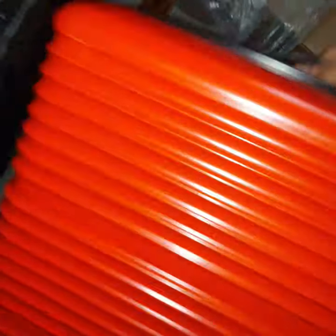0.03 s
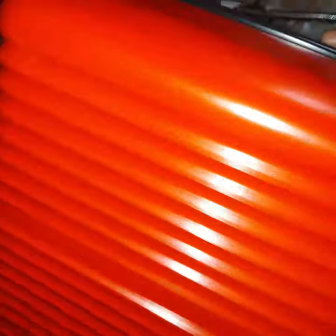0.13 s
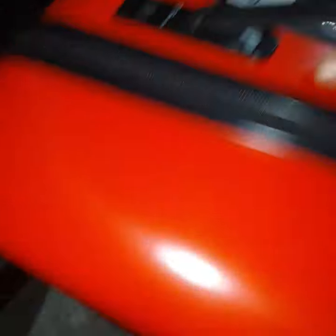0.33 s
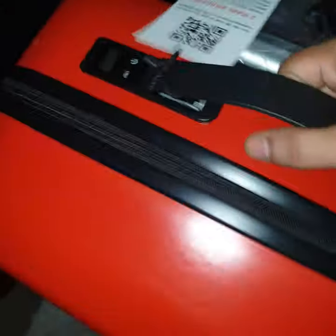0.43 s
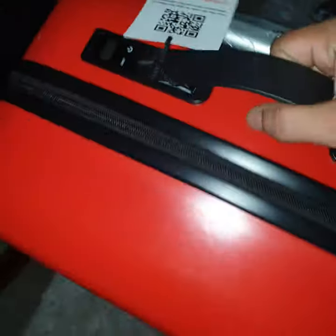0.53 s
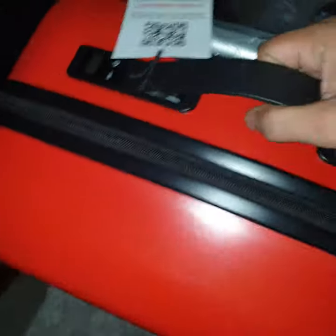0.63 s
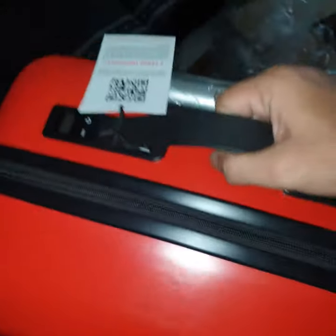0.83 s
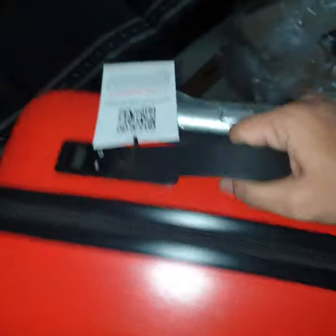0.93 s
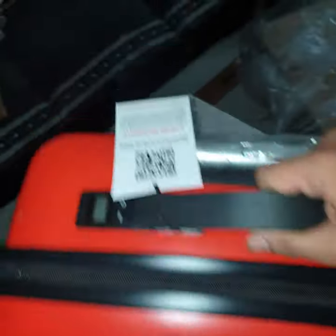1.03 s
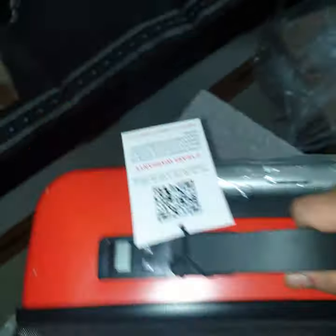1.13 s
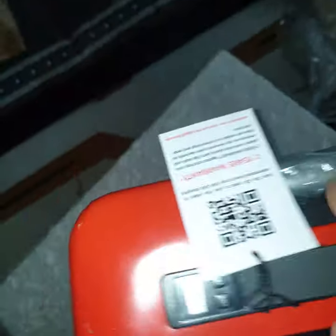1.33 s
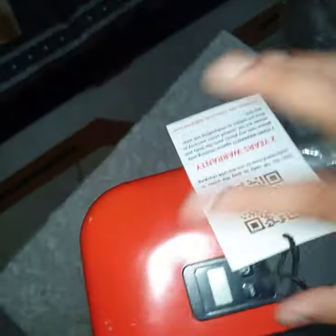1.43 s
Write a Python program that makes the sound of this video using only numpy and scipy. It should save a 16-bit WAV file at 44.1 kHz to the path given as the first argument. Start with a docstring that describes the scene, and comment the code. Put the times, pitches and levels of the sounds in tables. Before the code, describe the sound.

Hollow double knock of a plastic suitcase being tipped and set down, its handle clicking.

```python
"""A hollow rumble and soft bumps, close to the microphone: a hard plastic suitcase is tipped up in a
small room. Half a second in it knocks down in a quick cluster of blows that clack, ring its walls and
make the shell boom. The handle snaps against its stops and small metal fittings tinkle. Softer knocks,
clicks and the rub of a hand follow over the room's low rumble."""
import sys
import numpy as np
from scipy import signal
from scipy.fft import rfft, irfft, next_fast_len
from scipy.io import wavfile
from scipy.ndimage import map_coordinates

SR = 44100
rng = np.random.default_rng(int(sys.argv[2]) if len(sys.argv) > 2 else 0)


def dump_mix(stems):
    """Bounce the given channels to the path in sys.argv[1] as a 16-bit WAV at rate SR."""
    frames = np.atleast_2d(stems).T  # one column per channel
    limited = np.clip(frames, -1, 1)  # hard clip at full scale
    pcm = np.round(limited * 32767).astype(np.int16)
    wavfile.write(sys.argv[1], SR, pcm)


N = 66150

# how alike the two channels are for diffuse sound (frequency [Hz], likeness [0-1])
DIFFUSE_LIKENESS = [(30, 0.35), (70, 0.71), (140, 0.86), (280, 0.96), (550, 0.55), (2000, 0), (4000, 0),
                    (12000, 0)]
# the same for contacts close to the microphone (frequency [Hz], likeness [0-1])
CLOSE_LIKENESS = [(150, .97), (500, 0.33), (2000, 0.87), (5000, 0), (12000, 0)]
CLICK_RISE_S, TOP_HZ = 0.00091, 16050


def amp(db):
    """Decibels to gain."""
    return 10 ** (np.asarray(db) / 20)


def unit(x):
    """Scale to rms 1."""
    return x / np.sqrt(np.mean(x ** 2) + 1e-20)


def along(points, hz):
    """Read (frequency, value) points on a log axis."""
    freqs, values = np.transpose(points)
    return np.interp(np.log(hz + 1), np.log(freqs + 1), values)


def clock():
    """Time of each sample in seconds."""
    return np.arange(N) / SR


def fade(t, t60):
    """Exponential decay, 60 dB down after t60."""
    return amp(-60 * t / t60)


def wobble(rate_hz):
    """A smooth random curve for each channel."""
    return np.array([map_coordinates(rng.standard_normal(4000), [clock() * rate_hz]) for _ in range(2)])


def add(track, at, sound):
    """Mix a sound in from a time in seconds."""
    start = int(np.clip(round(at * SR), 0, N - 1))
    track[..., start:] += sound[..., :N - start]


def filtered(x, response):
    """Apply a gain that depends on frequency."""
    size = next_fast_len(N + 8192)
    return irfft(rfft(x, size) * response(np.fft.rfftfreq(size, 1 / SR)), size)[..., :N]


def noise(colour, likeness, tilt_db=0, top_hz=SR):
    """Stereo noise of rms 1, tilted by tilt_db per octave above 400 Hz."""
    def response(hz):
        width = np.arccos(np.clip(along(likeness, hz), -1, 1)) / 2
        tilt = tilt_db * np.log2(np.maximum(hz, 400) / 400)
        band = (hz > 20) / (1 + (hz / top_hz) ** 8)
        return amp(along(colour, hz) + tilt) * band * np.array([np.cos(width), np.sin(width)])
    mid, side = filtered(rng.standard_normal((2, N)), response)
    return unit(np.array([mid + side, mid - side]))


def ring(modes, t):
    """Damped modes, each reaching left and right at slightly different times."""
    out = 0
    for hz, db, t60 in modes:
        arrival = t + rng.normal(0, 2.2e-5, (2, 1))
        out += amp(db) * fade(t, t60) * np.sin(2 * np.pi * (hz * arrival + rng.random()))
    return out


def struck(modes, t, rise_cycles=0.49):
    """Modes set ringing by a blow; low ones build up slowest."""
    return -sum(amp(db) * fade(t, t60) * np.sin(2 * np.pi * hz * t) * (1 - np.exp(-t * hz / rise_cycles))
                for hz, db, t60 in modes)


def favour(modes, ring_hz, width_oct, rest_db=-13):
    """The point of contact favours the modes near one pitch; the rest ring weaker."""
    return [(hz, db + rest_db * (1 - np.exp(-(np.log2(hz / ring_hz) / width_oct) ** 2)), t60)
            for hz, db, t60 in modes]


def room(x):
    """The small room's tail, building up just after the direct sound."""
    # reverberation time (frequency [Hz], t60 [s])
    decay = [(150, 0.19), (330, 0.4), (600, 0.31), (2500, 0.38), (12000, 0.44)]
    white = noise([(20, 0), (20000, 0)], DIFFUSE_LIKENESS)[:, :SR // 2]
    hz, t, bands = signal.stft(white, SR, nperseg=256)
    envelope = fade(t, along(decay, hz)[:, None]) * (1 - np.exp(-t / 0.0024))
    tail = signal.istft(bands * envelope, SR, nperseg=256)[1]
    return signal.fftconvolve(x, tail / np.linalg.norm(tail[0]), axes=1)[:, :N]


def room_tone():
    """The room's steady rumble, with a faint flickering rustle."""
    # spectra of the rumble and the rustle (frequency [Hz], level [dB])
    air_colour = [(25, -22), (50, -6.5), (85, -8), (130, 1), (165, 3), (200, -6.5), (260, -2.5),
                  (370, -5.5), (480, -16.5), (800, -11.5), (1150, -20.5), (2450, -20.5), (2800, -26),
                  (3300, -33.5), (8200, -38.5), (15500, -42.5)]
    rustle_colour = [(200, -3.5), (550, -2), (1800, -7), (3000, -15), (6800, -18), (7500, -14), (8100, -27),
                     (16000, -37)]
    flicker_db = 5.5 * np.tanh(wobble(rate_hz=41)[0])
    rustle = amp(-52 + flicker_db) * noise(rustle_colour, DIFFUSE_LIKENESS)
    return amp(-41) * noise(air_colour, DIFFUSE_LIKENESS) + rustle


def handling():
    """The shifting case rumbles and hisses, dying away once it lands; the hand rubs the handle."""
    # spectra of the shifting shell, its sliding and the rubbing hand (frequency [Hz], level [dB])
    rumble_colour = [(25, -22), (45, 1.5), (90, -6), (134, 5), (200, -11), (350, -13), (520, -12.5),
                     (620, -25), (1270, -31), (1600, -56), (3000, -51), (6600, -88)]
    slide_colour = [(100, -38), (175, 2.5), (260, -1), (320, -2.5), (400, -9), (600, -15.5), (1200, -13),
                    (3100, -25.5), (16000, -45)]
    rub_colour = [(300, -32), (950, 1), (1350, 0), (2000, 8), (3000, -6), (6500, -8.5), (15000, -25)]
    # swell of the rumble (time [s], level [dB])
    rumble_level = [(0, -63), (.08, -41), (.12, -42), (.19, -30), (.225, -26), (.30, -27), (.37, -24.5),
                    (.445, -29.5), (.495, -30), (.525, -23.5), (.62, -33.5), (.69, -43), (.745, -40.5),
                    (.81, -52), (1.5, -88)]
    # strokes of the hand (middle [s], half length [s], level [dB])
    rubs = [(0.642, 0.0028, -42), (1.046, 0.022, -50.5), (1.35, 0.0052, -47), (1.451, 0.011, -48),
            (1.49, 0.018, -46)]
    t = clock()
    rumble = amp(np.interp(t, *np.transpose(rumble_level))) * noise(rumble_colour, DIFFUSE_LIKENESS)
    slide = amp(-37) * np.interp(t, [0.59, 0.79], [1, 0]) * noise(slide_colour, DIFFUSE_LIKENESS)
    strokes = sum(amp(db) * np.exp(-((t - at) / half) ** 2) for at, half, db in rubs)
    judder = amp(3 * wobble(rate_hz=35.78)[0])
    return (rumble + strokes * noise(rub_colour, CLOSE_LIKENESS)) * judder + slide


def bumps(swell_cycles=0.83):
    """Padded contacts as the case is tipped: a few low cycles that swell and die."""
    # soft bumps (time [s], level [dB], pitch [Hz])
    contacts = [(0.094, -29.5, 89), (0.156, -26, 71.3), (.214, -19, 145), (0.254, -21, 108),
                (0.285, -17.5, 73), (0.338, -21, 109), (0.36, -18.5, 123.4), (0.414, -30, 118),
                (0.727, -39, 57), (0.77, -39.5, 98)]
    t, out = clock(), np.zeros((2, N))
    for at, db, hz in contacts:
        swell = t * hz / swell_cycles
        add(out, at, amp(db) * swell ** 2 * np.exp(2 * (1 - swell)) * np.sin(2 * np.pi * hz * t))
    return out + amp(-26) * room(out)


def fittings(flutter_hz=130, flutter_depth=0.6, wander_s=1.5e-5):
    """Small loose metal parts tick and ring on in a high shimmer, fluttering as they swing."""
    # fittings touching (time [s], level [dB], favoured pitch [Hz])
    tinks = [(0.171, -63, 11590), (0.206, -62, 11590), (0.375, -64, 13160), (0.409, -62, 11590),
             (0.428, -56, 13160), (0.541, -50, 11590), (0.569, -47.5, 11620), (0.605, -54, 13160),
             (0.66, -49, 11590), (0.732, -48.5, 10200), (0.734, -49, 11830)]
    # modes of the metal (frequency [Hz], level [dB], t60 [s])
    metal_modes = [(10200, 3.5, 0.14), (11600, 6, 0.18), (13160, 1, .22), (15280, -1, .14)]
    # spectrum of the ticks and the shimmer (frequency [Hz], level [dB])
    colour = [(8500, -17), (10400, -4), (11600, -0.5), (12500, -2), (13100, -4), (14000, -11),
              (16000, -5.5)]
    # swell of the shimmer (time [s], level [dB])
    shimmer_level = [(0, -61), (.48, -60), (.55, -44.5), (.60, -63), (.70, -74), (.95, -70), (1.015, -57),
                     (1.16, -66.5), (1.5, -74)]
    t, out = clock(), np.zeros((2, N))
    for at, db, ring_hz in tinks:
        swung = t + wander_s * wobble(flutter_hz)
        tone = ring(favour(metal_modes, ring_hz, width_oct=0.03), swung)
        flutter = unit(1 + flutter_depth * wobble(flutter_hz))
        tick = amp(8.5) * fade(t, t60=0.033) * noise(colour, CLOSE_LIKENESS)
        add(out, at, amp(db) * (tone * flutter + tick) * (1 - np.exp(-t / CLICK_RISE_S)))
    shimmer_gain = amp(np.interp(t, *np.transpose(shimmer_level)))
    return out + amp(-6) * room(out) + shimmer_gain * noise(colour, DIFFUSE_LIKENESS)


def handle():
    """The handle hits its stops: a crack and a brief plastic ring."""
    # clicks (time [s], level [dB], favoured pitch [Hz], crack tilt [dB/octave], crack treble limit [Hz],
    # left over right [dB])
    clicks = [(0.5053, -17.5, 2850, -1, 9500, -1.5), (0.5622, -17, 3120, -1, 15500, 0.5),
              (0.661, -41, 4200, 4, 4500, 0), (1.099, -37.5, 3740, 2.5, 6450, 0),
              (1.3642, -32, 1700, -2.5, 7500, -5), (1.3685, -36, 8150, 2, 13500, 11),
              (1.4812, -39, 6500, 3.5, 10000, -2), (1.4915, -32, 1850, -.5, 6500, 0)]
    # modes of the handle (frequency [Hz], level [dB], t60 [s])
    handle_modes = [(1430, -2, 0.01), (1820, 1, 0.017), (2850, -1, 0.014), (3120, -.5, 0.012),
                    (4200, 2, 0.011), (6100, 1, 0.011), (8150, -5, .01)]
    # spectrum of the crack (frequency [Hz], level [dB])
    crack_colour = [(300, 4), (800, -2.5), (1700, -1), (3000, -28), (3700, 1), (6300, -6.5), (9300, -7),
                    (11200, -0.5), (16000, -3)]
    t, out = clock(), np.zeros((2, N))
    for at, db, ring_hz, tilt_db, top_hz, pan_db in clicks:
        crack = amp(1.5) * fade(t, t60=0.013) * noise(crack_colour, CLOSE_LIKENESS, tilt_db, top_hz)
        tone = amp(4.5) * ring(favour(handle_modes, ring_hz, width_oct=0.1), t)
        click = amp(db) * (crack + tone) * (1 - np.exp(-t / CLICK_RISE_S))
        pan = amp([[pan_db / 2], [-pan_db / 2]])
        add(out, at, click * pan + amp(-4.5) * room(click))
    return out


def shell_knocks(contact_rise_s=0.00052):
    """Each blow clacks, rings the walls and makes the hollow case boom."""
    # blows on the shell (time [s], boom [dB], wall ring [dB], clack [dB], clack tilt [dB/octave])
    knocks = [(.5080, -9, -10, -21, -2), (0.5198, -12, -9.5, -14.5, -1.5), (0.5243, -38, -6, -14, -10.5),
              (0.5319, -6, -36, -48, -5), (0.662, -30, -29, -35.5, -4), (1.005, -28, -70, -28, -4.5),
              (1.0124, -22.5, -23, -30.5, -6), (1.035, -23.5, -29.5, -33, -7), (1.089, -27, -36, -45, -9),
              (1.3647, -58, -29, -30, -1), (1.434, -31.5, -25, -38, -4)]
    # modes of the hollow shell, its walls and the stiff panel hit (frequency [Hz], level [dB], t60 [s])
    hollow_modes = [(145, -11, 0.14), (163.7, 1.5, 0.1), (245, -21, 0.29), (303, -36, 0.066)]
    wall_modes = [(369, -10.5, 0.11), (466.3, -10, 0.067), (541, -11, 0.064), (596, -26, 0.11),
                  (695, -29, 0.11), (886, -23, 0.067), (1147, -31, 0.016)]
    panel_modes = [(1080, 1, .022), (2000, 0, .025), (2350, -4, .012)]
    # spectrum of the clack (frequency [Hz], level [dB])
    clack_colour = [(60, -6), (200, -7), (450, -2.5), (720, -4), (1150, 0.5), (1500, -10.5), (2100, -4),
                    (2700, -13.5), (5000, -19.5), (15000, -29.5)]
    t, boom, clack = clock(), np.zeros((2, N)), np.zeros((2, N))
    hollow, walls = struck(hollow_modes, t), struck(wall_modes, t)
    for at, boom_db, wall_db, clack_db, tilt_db in knocks:
        panel = ring([(hz, db + tilt_db * np.log2(hz / 400), t60) for hz, db, t60 in panel_modes], t)
        burst = fade(t, t60=0.032) * noise(clack_colour, CLOSE_LIKENESS, tilt_db)
        contact = (panel + burst) * (1 - np.exp(-t / contact_rise_s))
        add(boom, at, amp(boom_db) * hollow)
        add(clack, at, amp(wall_db) * walls + amp(clack_db) * contact)
    return boom + clack + amp(-4) * room(boom) + amp(-6.5) * room(clack)


def scene():
    """The suitcase at close range, with the small room behind it."""
    return shell_knocks() + handle() + fittings() + bumps() + handling() + room_tone()


def record(dry, low_cut_hz=34):
    """The microphone drops the deepest bass; nothing is kept above the band limit."""
    return filtered(dry, lambda hz: hz ** 2 / np.hypot(hz ** 2, low_cut_hz ** 2) * (hz < TOP_HZ))


dry = scene()
out = record(dry)
dump_mix(out)
```